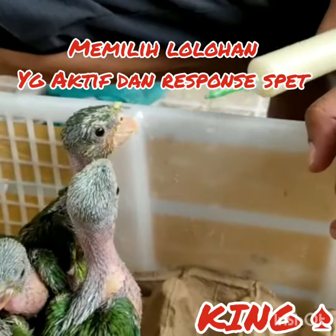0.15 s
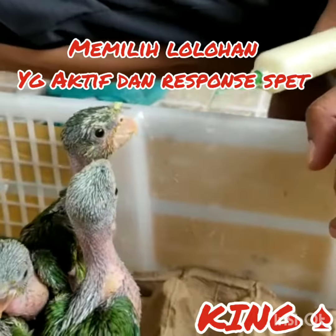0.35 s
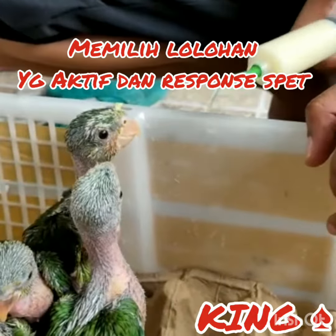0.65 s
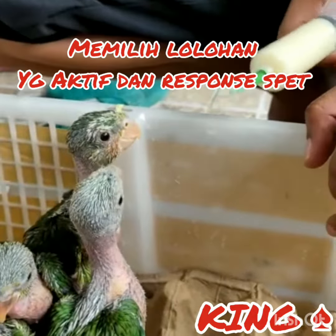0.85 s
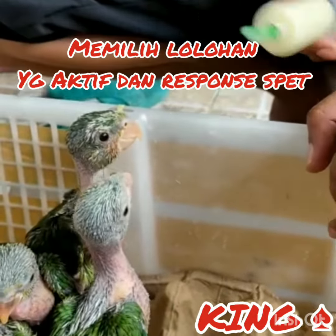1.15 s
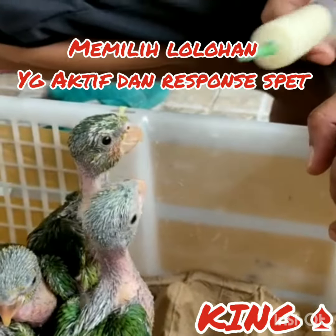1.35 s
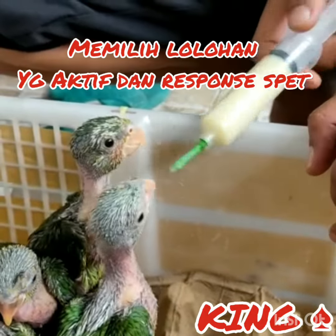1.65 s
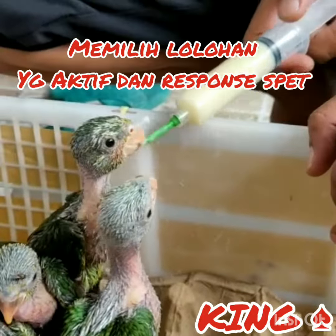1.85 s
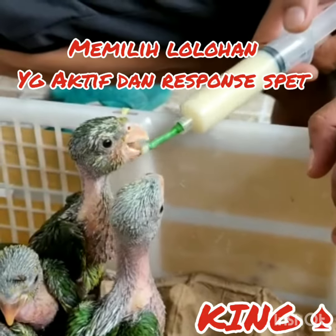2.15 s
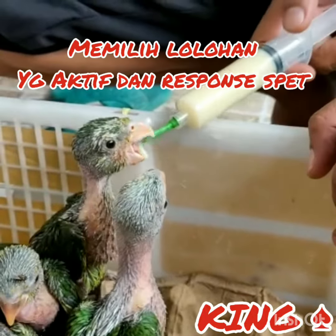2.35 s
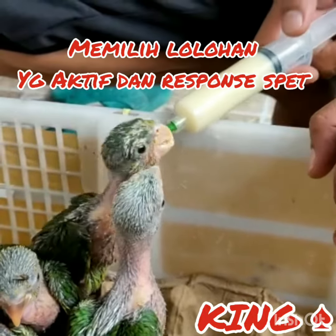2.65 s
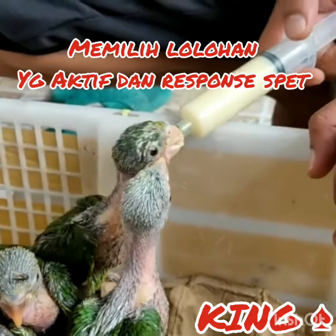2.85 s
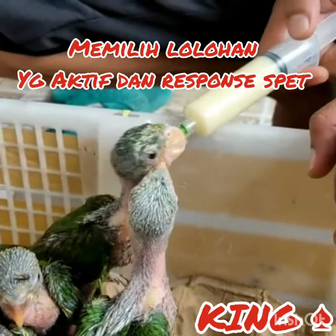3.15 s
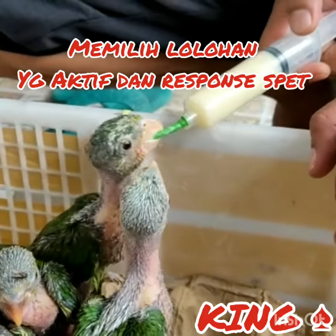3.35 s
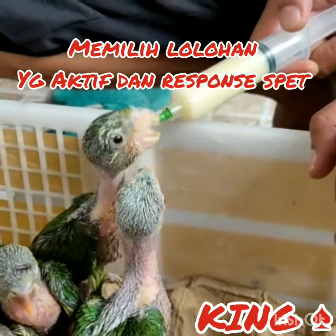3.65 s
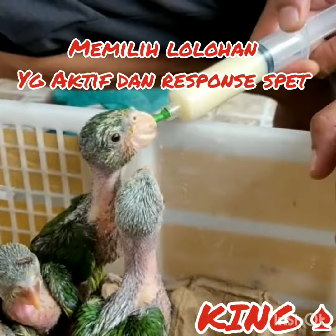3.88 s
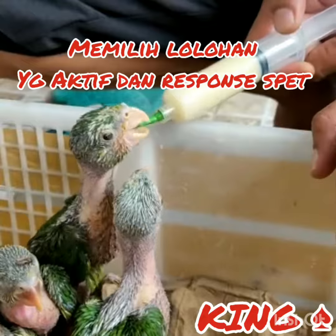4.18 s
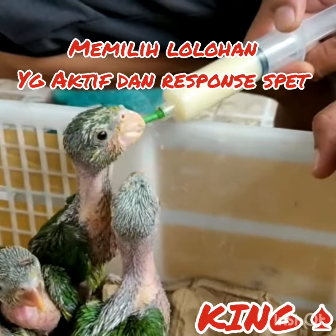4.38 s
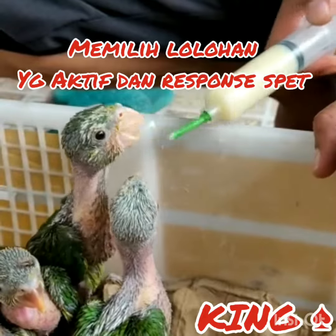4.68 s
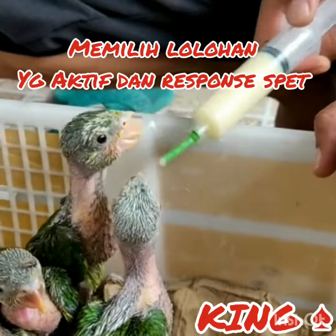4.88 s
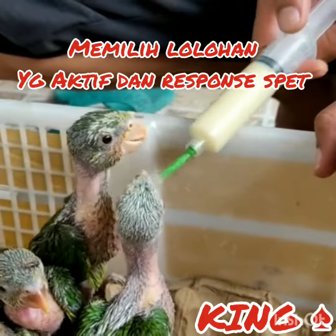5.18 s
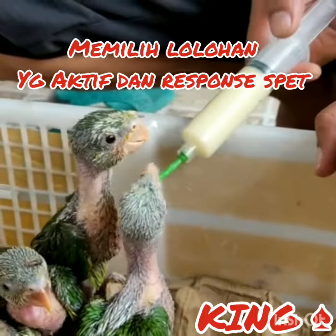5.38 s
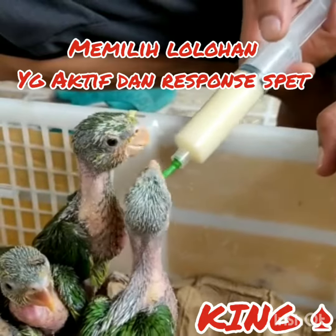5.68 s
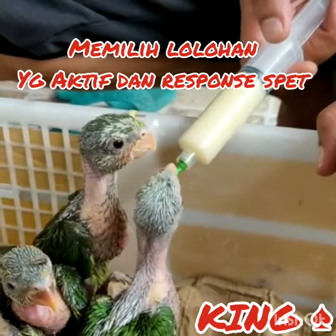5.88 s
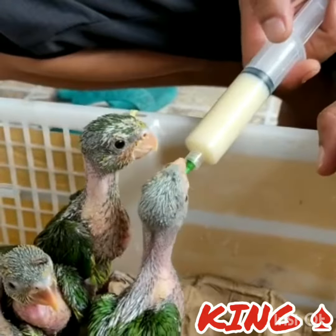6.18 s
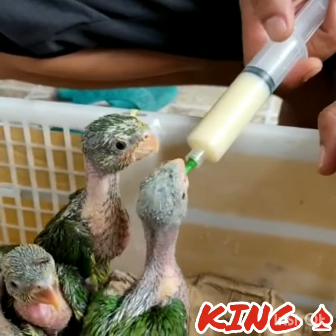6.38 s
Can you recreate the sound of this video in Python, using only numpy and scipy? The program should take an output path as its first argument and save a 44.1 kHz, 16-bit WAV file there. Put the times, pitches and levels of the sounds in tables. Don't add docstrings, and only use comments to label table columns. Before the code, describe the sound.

Very close indoor stereo pickup of two young parakeets in a plastic crate. One in front gives three harsh, raspy begging calls at once, then a long lull with soft knocks, beak ticks and tiny breaths. It calls four more times, then the second chick to the side answers with four. Quiet shuffling follows, and a faint chirp of another bird across the room near the end, over a low machine hum.

```python
import sys
import numpy as np
from scipy import signal
from scipy.fft import rfft, irfft, next_fast_len
from scipy.io import wavfile
from scipy.ndimage import uniform_filter1d, map_coordinates

SR = 44100
rng = np.random.default_rng(int(sys.argv[2]) if len(sys.argv) > 2 else 0)


def boost_factor(decibels):
    exponent = np.asarray(decibels, float) / 20
    return 10 ** exponent


def transcribe(signal):
    frames = np.atleast_2d(signal).T
    limited = np.clip(frames, -1, 1)
    pcm = np.round(limited * 32767).astype(np.int16)
    wavfile.write(sys.argv[1], SR, pcm)


N = 287973


def along(points, hz):
    f, v = np.transpose(points)
    return np.interp(np.log(hz + 1), np.log(f + 1), v)


def unit(x):
    return x / np.sqrt(np.mean(x ** 2) + 1e-20)


def wobble(rate, size):
    knots = rng.standard_normal(int(size * rate / SR) + 4)
    return map_coordinates(knots, [np.arange(size) * rate / SR])


def filtered(x, response):
    m = next_fast_len(N + SR // 2)
    return irfft(rfft(x, m) * response(np.fft.rfftfreq(m, 1 / SR)), m)[..., :N]


def causal(points, hz):
    cep = irfft(np.log(boost_factor(along(points, hz))))
    cep[1:len(cep) // 2] *= 2
    cep[len(cep) // 2 + 1:] = 0
    return np.exp(rfft(cep))


def add(track, s, x):
    i = max(round(s * SR), 0)
    track[..., i:i + x.shape[-1]] += x[..., :track.shape[-1] - i]


def left_late(x, lag_s):
    return filtered(x, lambda hz: np.exp(-1j * np.pi * lag_s * np.outer([1, -1], hz)))


def rush(spectrum, patchy_db, alike=None):
    # f/Hz, left-right likeness
    room_likeness = [(60, .93), (180, .92), (550, 0.75), (1650, .95), (4970, 0.53), (15000, -1.1)]
    alike = room_likeness if alike is None else alike
    z = signal.stft(rng.standard_normal((2, N + 512)), nperseg=512)[2]
    field = uniform_filter1d(rng.standard_normal(z.shape[1:]), 6, 0)
    field = uniform_filter1d(field, 14, 1)
    pair = signal.istft(z * boost_factor(patchy_db * unit(field)), nperseg=512)[1][:, :N]

    def mid_side(hz):
        turn = np.arccos(np.clip(along(alike, hz), -1, 1)) / 2
        return boost_factor(along(spectrum, hz)) * [np.cos(turn), np.sin(turn)]

    mid, side = filtered(pair, mid_side)
    return unit(np.array([mid + side, mid - side]))


def room_tone():
    # f/Hz, density/dB
    hum_colour = [(15, -71.5), (25, -29.5), (54, -30), (86, -2), (120, -7), (162, -3.5), (184, -1.5),
                  (231, -2), (269, -16), (296, -14.5), (330, -35), (430, -60.5), (730, -120)]
    # f/Hz, density/dB
    air_colour = [(160, -21.5), (280, -4.5), (380, -8.5), (403, -3.5), (796, -7.5), (1470, -16),
                  (1580, -14.5), (2370, -15), (2700, -40.5), (5910, -42.5), (9000, -50.5), (11700, -89),
                  (19800, -120)]
    # f/Hz, level/dB
    hum_lines = [(193, -56.5), (219, -65), (103, -59)]
    # middle t/s, length/s, boom level/dB, rustle level/dB
    stirs = [
        (0.045, 0.39, 5.5, 7.5),
        (0.421, 0.35, 3, -0.5),
        (1.15, .7, -2, -3),
        (1.947, .3, 1, 1.5),
        (3.05, .3, -0.3, 4),
        (4.11, 0.15, 0.4, 4),
        (2.641, 0.34, 8, 16),
        (4.49, 0.46, 4.5, 15.5),
        (5.764, 0.52, 2.5, 1.5),
        (6.4, 1, -1, 2.5),
    ]
    hum_db, air_db = -51, -58.5
    t = np.arange(N) / SR
    stir_db = sum(np.exp(-(2 * (t - s) / length) ** 2) * np.array([[boom_db], [rustle_db]])
                  for s, length, boom_db, rustle_db in stirs)
    hum = boost_factor(hum_db + stir_db[0] + 0.17 * wobble(43, N)) * rush(hum_colour, patchy_db=-0.93)
    notes = sum(boost_factor(db + 1.9 * wobble(2.6, N)) * np.sin(2 * np.pi * hz * t + 0.99 * wobble(9, N))
                for hz, db in hum_lines)
    air = boost_factor(air_db + stir_db[1] + 0.37 * wobble(3.3, N)) * rush(air_colour, patchy_db=2.0)
    return hum + notes + air


def port_rumble():
    # f/Hz, density/dB
    rumble_colour = [(15, -34.5), (30, -1.5), (60, 13), (130, -2), (300, -9.5), (600, -42)]
    return boost_factor(-62) * rush(rumble_colour, patchy_db=5.5, alike=[(30, 0.65), (150, 0.091)])


def call_shape(t, arch, breath, effort_db):
    rest_hz, lock_hz, lock_steep = 392, 1220, 20
    loose_rough, locked_rough = .8, .045
    snap_s, break_s = .0025, .004
    open_s = .006
    top_hz, top_s, rise_s, fall_s, square = arch
    lead_s, hold_s, release_s, break_hz = breath
    tension = np.exp(-(np.abs(t - top_s) / np.where(t < top_s, rise_s, fall_s)) ** square)
    hz = rest_hz + (top_hz - rest_hz) * tension
    locked = 1 / (1 + (np.where(t < top_s, lock_hz, break_hz) / hz) ** lock_steep)
    stages = [-lead_s, -snap_s / 2, snap_s / 2, hold_s, hold_s + break_s, hold_s + release_s]
    gain = boost_factor(np.interp(t, stages, effort_db)) * np.clip((t + lead_s) / open_s, 0, 1) * (t < stages[-1])
    return hz, gain, loose_rough + (locked_rough - loose_rough) * locked


def syrinx(arch, breath, effort_db, calls, jitter, scatter_db, hiss, double, starve):
    out, t = np.zeros(N), np.arange(-2400, 3200) / SR
    orders = np.arange(1, 41)[:, None]
    for s, db, pitch, lead, tail in calls:
        hz, effort, slack = call_shape(t / np.where(t < 0, lead, tail), arch, breath, effort_db)
        rate = pitch * hz
        cycles = np.cumsum(rate * np.exp(jitter * slack * wobble(500, len(t)))) / SR
        harmonics = np.cos(2 * np.pi * orders * cycles) * (orders * rate < 17000)
        pulses = np.sum(harmonics, axis=0) * np.sqrt(rate / 8500)
        pulses -= starve * np.sqrt(rate / 8500) * np.cos(2 * np.pi * cycles)
        nth = np.round(cycles).astype(int)
        scatter = boost_factor(scatter_db * slack * rng.standard_normal(len(t))[nth])
        size = scatter * (1 + double * (-1) ** nth)
        puff = rng.standard_normal(len(t)) * (1.64 + 1.0 * np.cos(2 * np.pi * cycles))
        voice = size * (pulses * np.sqrt(1 - slack) + hiss * puff * slack ** .8)
        voice *= boost_factor(db) * effort
        add(out, s + t[0], voice[max(round(-(s + t[0]) * SR), 0):])
    return out


def at_ports(voice, left, right, shadow, lag_s):
    def pair(hz):
        turn = np.exp(-1j * np.pi * hz * lag_s)
        return np.array([turn, boost_factor(along(right, hz) - along(left, hz)) / turn])

    return filtered(voice, lambda hz: causal(shadow, hz) * causal(left, hz) * pair(hz))


def chicks():
    # t/s, level/dB, pitch factor, lead-in stretch, arch stretch
    near_calls = [
        (0.042, -9.5, .99, 1.2, 1.01),
        (0.166, -9, .98, 0.88, 0.95),
        (.307, -10, .965, .9, .97),
        (2.495, -9, 1.01, .98, 1.05),
        (2.598, -8, 1.025, .98, 1.05),
        (2.716, -8, 1.01, .9, 1.01),
        (2.852, -9, .99, 0.92, 1.01),
    ]
    side_calls = [
        (4.289, -9, 1, 1, 1.05),
        (4.384, -8, 1.01, .9, 1),
        (4.495, -7.5, 1.01, .9, 1.03),
        (4.62, -8, .99, 1, 0.95),
    ]
    # f/Hz, level/dB
    near_left = [(350, -12), (1300, -1), (1900, -3), (2900, -3), (3400, -6), (4080, 6), (4950, -6),
                 (5750, 10), (6700, 14), (7300, 5), (7800, -12), (8400, -11), (9000, -6), (11400, -8)]
    near_right = [(350, -23), (1300, 1.5), (1900, 1.5), (2900, -2.5), (3400, -10.5), (4000, 5), (5100, 6),
                  (5750, 12), (6200, -3), (6700, 8), (7300, 2.5), (7800, -8.5), (8700, 1), (11400, -8.5)]
    side_left = [(350, -19), (1300, -1), (1850, 4.5), (2600, 3.5), (3450, 4), (4000, -0.5), (4700, -0.5),
                 (5300, -2), (5900, 8.5), (6500, -4.5), (7200, 6), (8100, -1), (9100, -7), (10900, -13.5)]
    side_right = [(350, -24), (1300, -1.5), (1850, 0.5), (2600, -8.5), (3600, -0.5), (4300, -7), (5400, 2),
                  (5900, -7), (6450, 6.5), (6900, -8.5), (7300, 0), (8100, -1.5), (9100, -12.5),
                  (10900, -10)]
    # f/Hz, level/dB
    near_shadow = [(80, -26.5), (350, 3.5), (9100, -2.5), (9700, -12), (10300, -12.5), (11200, -5.5),
                   (12200, -3.5), (13350, -23.5), (14000, -17), (15600, -11.5)]
    side_shadow = [(80, -25), (350, 0.5), (9200, -3.5), (9700, -15.5), (10700, -2), (11200, -10.5),
                   (11800, -32.5), (12800, -14), (13500, -20.5), (14600, -15), (15600, -20)]
    # f/Hz, level/dB
    beak_aside = [(1300, -2.5), (2900, 2), (4000, -4), (5800, 0), (7800, 0.5), (12000, 0)]
    turns_s = 1.5
    bob_s = .00002
    # top rate Hz, top s after the voiced onset, rise s, fall s, squareness
    near_arch, side_arch = (1990, .017, .0205, .0152, 2.1), (1835, .018, .0225, .0125, 3.1)
    # lead-in s, hold s, release s, rate Hz where the even pulses break up
    near_breath, side_breath = (.038, .027, .027, 1400), (.029, .0245, .034, 1480)
    near_effort, side_effort = (-19.5, -11.5, 1, -2.5, -10, -23), (-23, -4.5, 4.5, 1, -5, -21.5)
    near = syrinx(near_arch, near_breath, near_effort, near_calls,
                  jitter=.45, scatter_db=0.5, hiss=1.037, double=0.14, starve=0.77)
    side = syrinx(side_arch, side_breath, side_effort, side_calls,
                  jitter=0.41, scatter_db=-3, hiss=1.01, double=0.062, starve=0.57)
    aside = filtered(near, lambda hz: causal(beak_aside, hz))
    near = np.where(np.arange(N) < turns_s * SR, aside, near)
    left, right = (at_ports(near, near_left, near_right, near_shadow, lag_s=.000285)
                   + at_ports(side, side_left, side_right, side_shadow, lag_s=-.00027))
    bob = bob_s * SR * wobble(8, N) / 2
    return np.array([map_coordinates(left, [np.arange(N) - bob]),
                     map_coordinates(right, [np.arange(N) + bob])])


def room(x, t60s=None, gap=300, size=SR):
    # f/Hz, t60/s
    room_t60 = [(200, 0.37), (1500, 0.58), (6000, 0.39), (12000, 0.37)]
    t60s = room_t60 if t60s is None else t60s
    hz, t, z = signal.stft(rng.standard_normal((2, size)), SR, nperseg=128)
    tail = signal.istft(z * boost_factor(-60 * t / along(t60s, hz)[:, None]), SR, nperseg=128)[1]
    late = np.pad(np.atleast_2d(x), ((0, 0), (round(gap), 0)))
    return signal.oaconvolve(late, tail / np.linalg.norm(tail[0]), axes=1)[:, :N]


def crate(x, wet_db):
    # f/Hz, t60/s
    crate_t60 = [(300, 0.035), (2600, 0.12), (12000, 0.017)]
    bob = 3.2 * wobble(6.5, N)
    treble = filtered(x, lambda hz: 1 / (1 + (2400 / (hz + 1)) ** 8))
    blur = sum(room(treble * way(bob), crate_t60, gap=40, size=4096) for way in (np.cos, np.sin))
    return x + boost_factor(wet_db) * blur


def knocks():
    # t/s, peak level/dB, note f/Hz, t60/s, snap level/dB
    hits = [(.575, -55, 720, 0.028, 9), (0.68, -25.5, 640, 0.0098, -10), (1.76, -23.5, 391, 0.04, -24),
            (2.018, -23.5, 412, 0.031, -25), (3.393, -48.5, 960, 0.035, 2.5),
            (3.45, -33.5, 685, 0.0097, -12), (4.586, -19.5, 2250, 0.017, -17), (4.848, -42, 654, 0.052, 10),
            (4.892, -33.5, 680, 0.035, 7.5), (5.21, -34.5, 414, 0.047, -25),
            (5.433, -36.5, 395, 0.043, -30), (5.68, -41, 895, 0.02, -3), (5.695, -34, 410, 0.068, -27),
            (5.982, -40, 398, 0.028, -15.5), (6.255, -49, 2025, 0.017, 1.5)]
    modes = [(.32, -5.5), (.55, -4), (1, 4), (2.1, -7), (3.2, -14)]
    out, t = np.zeros(N), np.arange(SR // 8) / SR
    for s, db, hz, t60, snap_db in hits:
        ring = sum(boost_factor(level_db - 60 * t * ratio ** 0.62 / t60) * np.sin(2 * np.pi * hz * ratio * t)
                   for ratio, level_db in modes)
        dull = uniform_filter1d(uniform_filter1d(rng.standard_normal(len(t)), size=6), size=4)
        snap = dull * boost_factor(snap_db + 4.5 - 60 * t / 0.039)
        add(out, s, boost_factor(db) * (ring + snap) * (1 - np.exp(-t / 0.001423)))
    return out


def breaths():
    # peak t/s, level/dB, length/s
    puffs = [(0.7, -64, 0.32), (1.314, -70.5, 0.27), (1.863, -64.5, 0.25), (2.162, -63, 0.092),
             (2.401, -63.5, 0.15), (3.021, -56, 0.33), (3.195, -71.5, 0.23), (3.431, -74.5, 0.11),
             (3.545, -65, 0.27), (4.148, -60.5, 0.29), (4.882, -48.5, .12), (5.282, -63.5, .27),
             (5.689, -59.5, 0.07), (5.844, -59.5, 0.37), (6.457, -57.5, 0.25)]
    # f/Hz, density/dB
    nostril = [(1650, -20.5), (2800, -9.5), (3400, -21.5), (3770, -29.5), (4700, -18), (5560, -15),
               (6900, 2), (8450, -14.5), (14000, -19.5)]
    t = np.arange(N) / SR
    swell = sum(boost_factor(db) * np.exp(-(2.97 * (t - s) / length) ** 2) for s, db, length in puffs)
    return swell * rush(nostril, patchy_db=-1.0)


def ticks():
    # t/s, peak level/dB, left over right/dB
    taps = [(0.7462, -46.5, 6), (0.8081, -55, 13), (0.8494, -61, 12), (0.9971, -60, 15),
            (1.0435, -59, 24.5), (1.4381, -47, 8.0), (1.4594, -59, 11.0), (1.8562, -45, 9.5),
            (1.9255, -52.5, 12), (2.0023, -39.5, 6), (2.1554, -43.5, 2.5), (2.1765, -48, 10),
            (2.2194, -43.5, 8), (2.2244, -57, 3), (2.4448, -40, 3), (3.0629, -32, 1), (3.0794, -40, 4),
            (3.1253, -31.5, 3.5), (3.236, -47, 6), (3.3942, -51.5, -5), (4.0347, -50, 8),
            (4.0876, -44.5, -1), (4.1294, -49, 5.5), (4.8544, -33.5, 26), (4.8788, -39, 16),
            (4.8938, -29.5, 3.5), (5.4894, -63, -10.5)]
    # t/s, peak level/dB, left over right/dB
    claps = [
        (2.0636, -36, 5),
        (2.1443, -39.5, 7.5),
        (2.3793, -39, 1),
        (3.1742, -41.5, 4),
        (4.8483, -25, 4),
    ]
    # f/Hz, width/Hz, level/dB
    horn = [(2280, 2390, -8.5), (5286, 600, -2.5), (6460, 1130, -2.5), (9300, 2600, -31.5)]
    tip_lead_s, tip_db = .009, -7.5
    tips = [(s - tip_lead_s, db + tip_db, pan_db) for s, db, pan_db in claps]
    cracks, t = np.zeros((2, N)), np.arange(300) / SR
    shape = boost_factor(-60 * t / 0.017) * (1 - np.exp(-t / 0.00037))
    for s, db, pan_db in taps + claps + tips:
        crack = unit(shape * rng.standard_normal((2, len(t))))
        add(cracks, s, boost_factor(db + 6.5 + pan_db * np.array([[.5], [-.5]])) * crack)

    def beak(f):
        return sum((-1) ** k * boost_factor(db) * 1j * f * w / (c * c - f * f + 1j * f * w)
                   for k, (c, w, db) in enumerate(horn))

    return filtered(cracks, lambda f: beak(f) ** 2)


def whistles():
    # t/s, length/s, f/Hz, level/dB
    far_notes = [
        (0.816, 0.35, 2300, -81.5),
        (.92, 0.089, 509, -58.5),
        (1.421, 0.058, 2740, -79),
        (1.656, .17, 5650, -79),
        (1.653, 0.11, 7780, -81.5),
        (6.045, 0.11, 706, -58.5),
        (6.429, 0.13, 1080, -61.5),
    ]
    out = np.zeros(N)
    for s, length, hz, db in far_notes:
        t = np.arange(round(length * SR)) / SR
        turn = 2 * np.pi * np.cumsum(hz * (1 + 0.012 * wobble(65, len(t)))) / SR
        level = boost_factor(db + 3 * wobble(40, len(t))) * np.sin(np.pi * t / length) ** .4
        add(out, s, level * np.sin(turn))
    return out


def far_chirp(s=6.189, db=-35, wet_db=9.0):
    t, out = np.arange(1300) / SR, np.zeros(N)
    glide_hz = np.interp(t, [0, .006, .016, .03], [6150, 6900, 6600, 6250])
    turn = 2 * np.pi * np.cumsum(glide_hz) / SR
    swell = np.sin(np.pi * t / t[-1]) ** 0.25
    add(out, s, boost_factor(db) * swell * (np.sin(turn) + boost_factor(-35.0) * np.sin(2 * turn)))
    direct = boost_factor(-5) * out
    return direct + boost_factor(wet_db) * room(out, gap=88)


def scene():
    voices = chicks()
    small = ticks() + left_late(knocks(), lag_s=0.000137)
    close = crate(voices, wet_db=-11) + boost_factor(-17.5) * room(voices)
    close = close + crate(small, wet_db=-11) + boost_factor(-14) * room(small)
    close = filtered(close, lambda hz: (1j * hz / (50 + 1j * hz)) ** 2)
    far = far_chirp() + whistles()
    return close + far + breaths() + left_late(room_tone(), lag_s=0.00021) + port_rumble()


def masked(x, margin_db, slope_db, quiet_db):
    top_hz = 15850
    hz, _, z = signal.stft(np.array([x[0] + x[1], x[0] - x[1]]) / 2, SR, nperseg=2048)
    edges = np.searchsorted(hz, np.geomspace(1300, top_hz, num=34))
    widths = np.diff(edges, append=len(hz))
    power = np.add.reduceat(np.abs(z) ** 2, edges, axis=1) / widths[:, None]
    bands = np.arange(len(edges))
    apart = np.abs(np.subtract.outer(bands, bands))
    mask = boost_factor(-2 * slope_db * apart) @ power.max(axis=0) * boost_factor(-2 * margin_db) + boost_factor(2 * quiet_db)
    z[:, edges[0]:] *= np.repeat(power > mask, widths, axis=1) * (hz[edges[0]:, None] < top_hz)
    mid, side = signal.istft(z, SR, nperseg=2048)[1][:, :N]
    return np.array([mid + side, mid - side])


def top_cut(x):
    return signal.sosfilt(signal.butter(12, 16730, fs=SR, output="sos"), x)


def record(dry):
    x = dry / (1 + np.abs(dry / .86) ** 6) ** (1 / 6)
    x = masked(x, margin_db=15, slope_db=3, quiet_db=-118)
    return top_cut(x)


dry = scene()
out = record(dry)
transcribe(out)
```